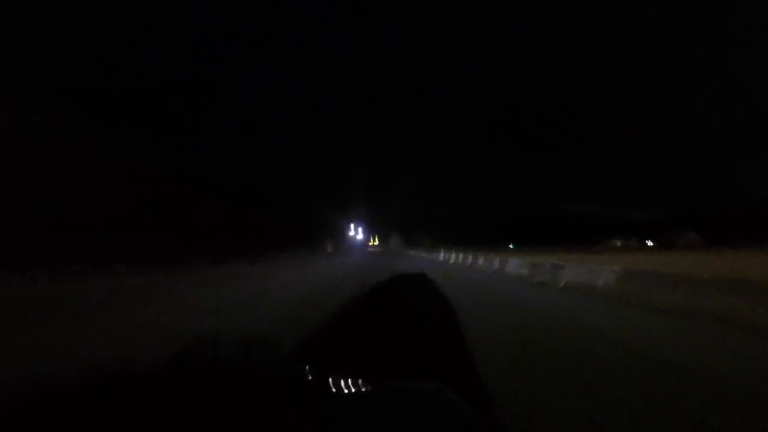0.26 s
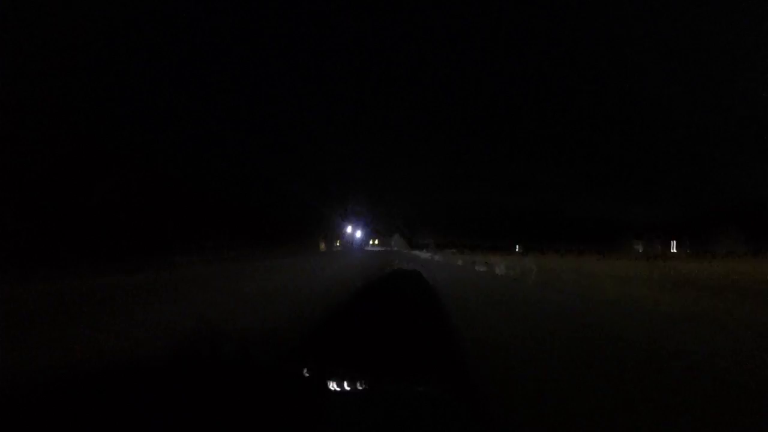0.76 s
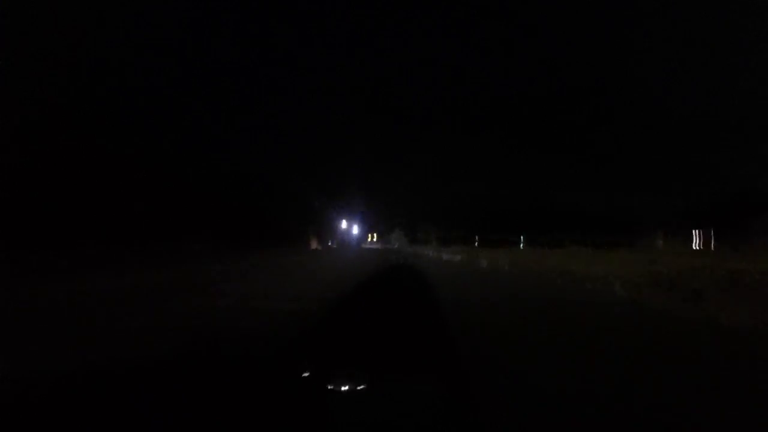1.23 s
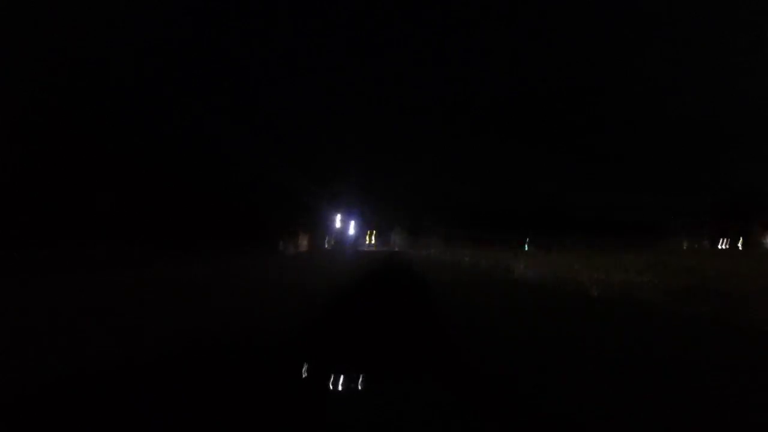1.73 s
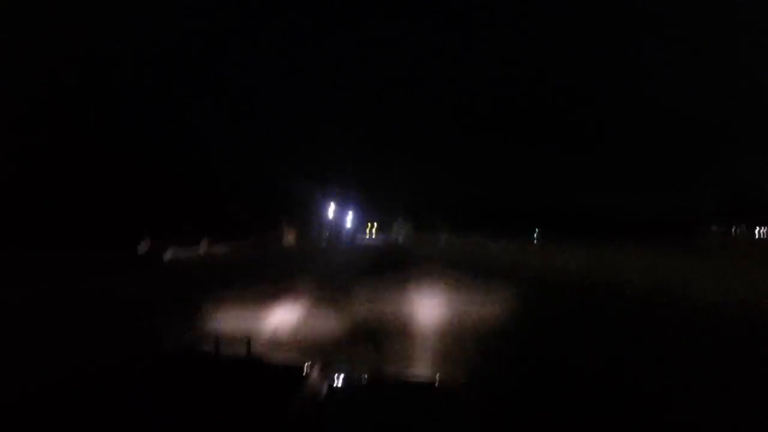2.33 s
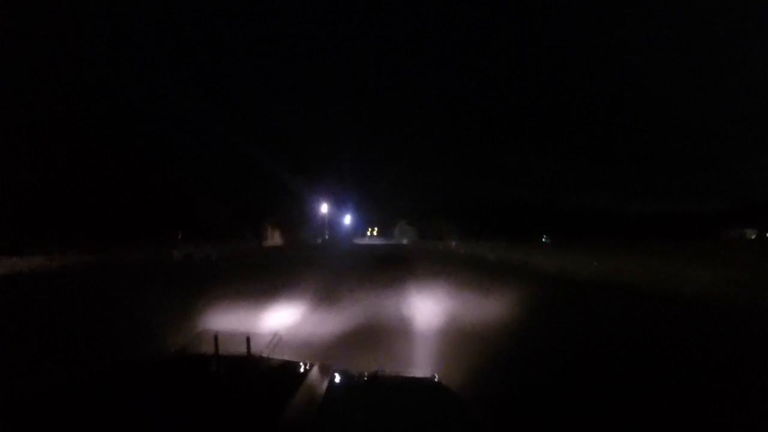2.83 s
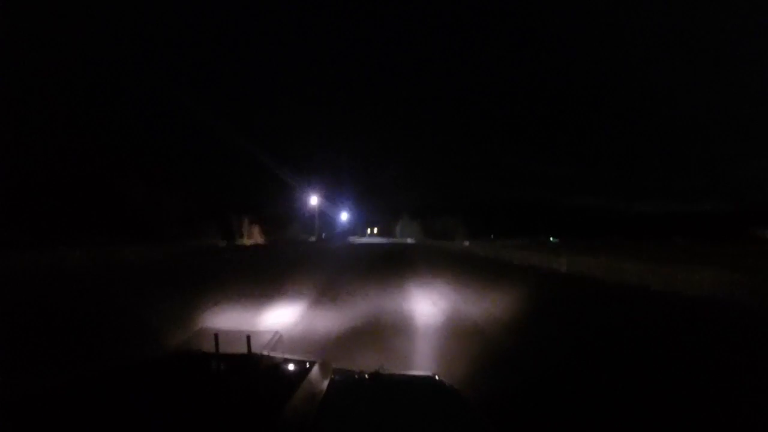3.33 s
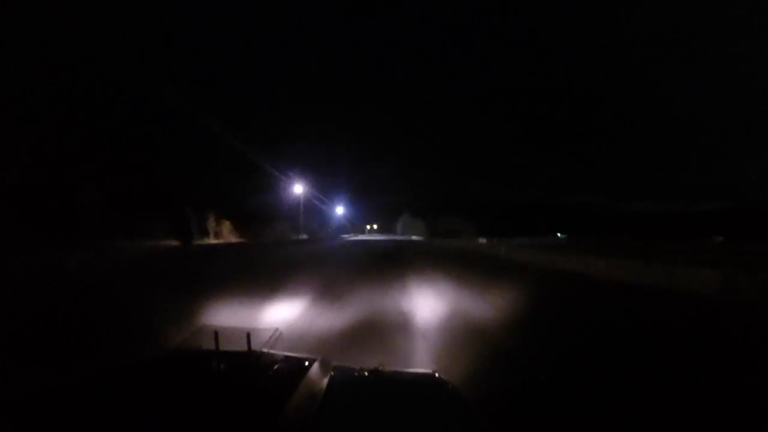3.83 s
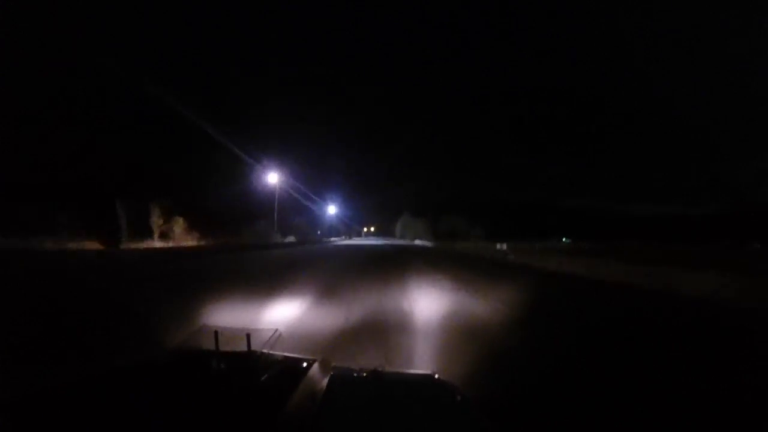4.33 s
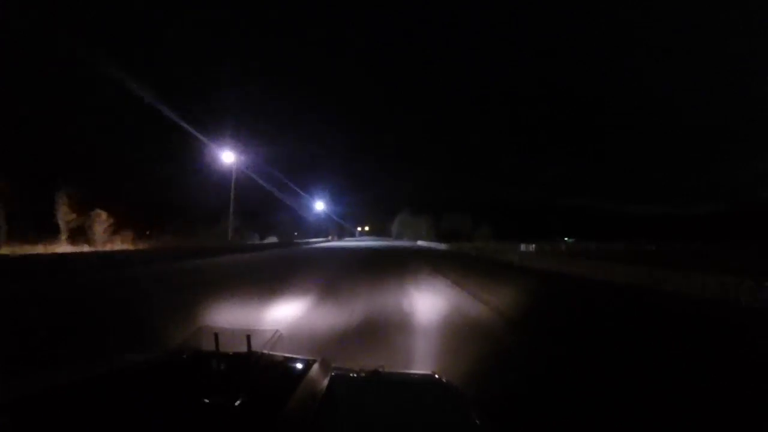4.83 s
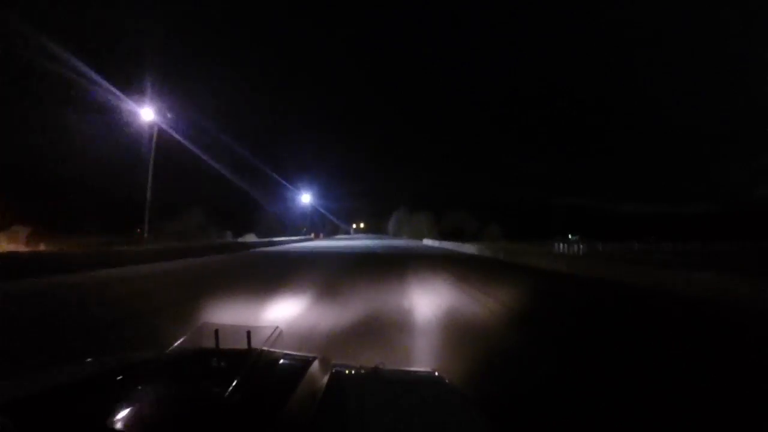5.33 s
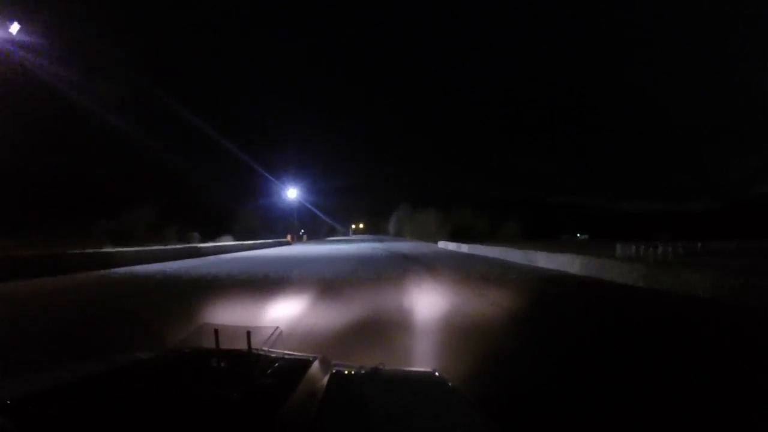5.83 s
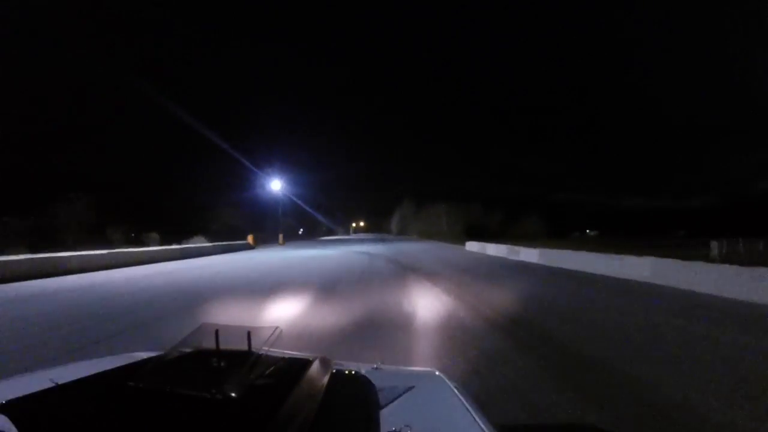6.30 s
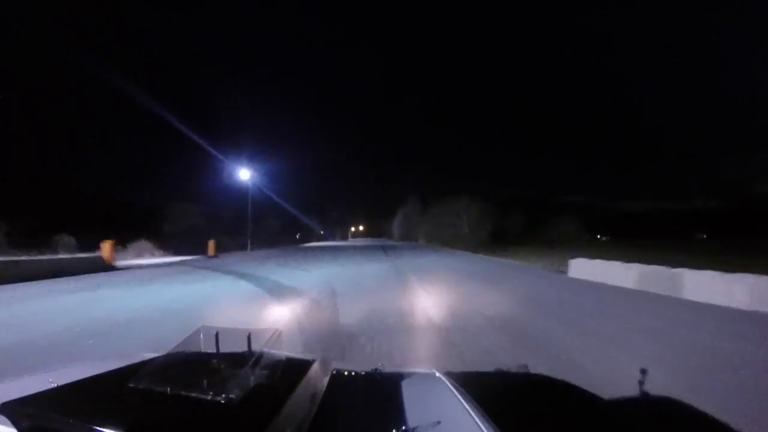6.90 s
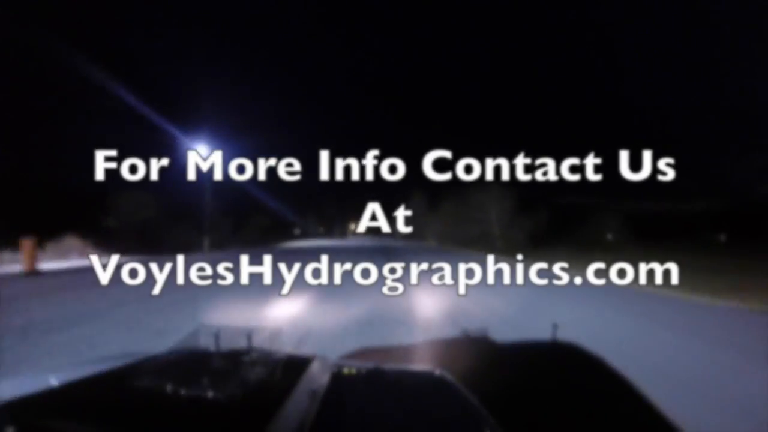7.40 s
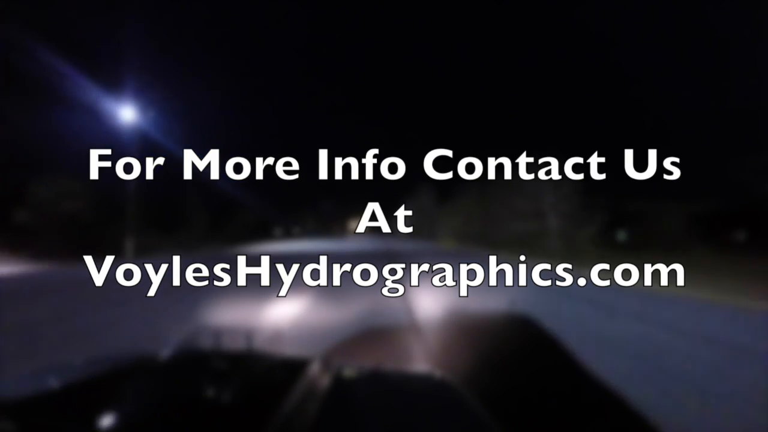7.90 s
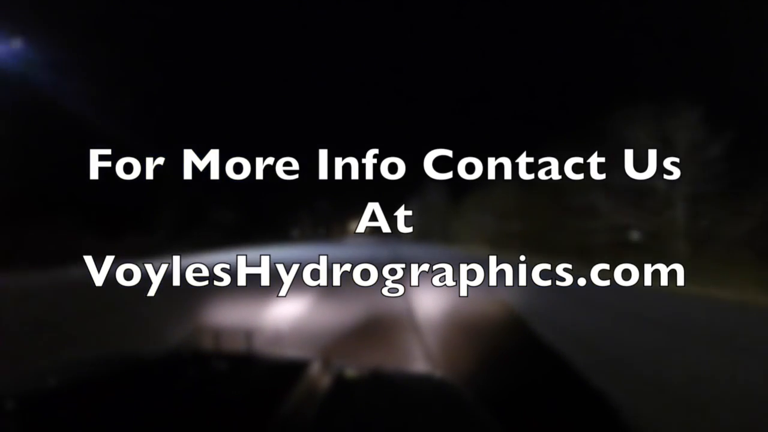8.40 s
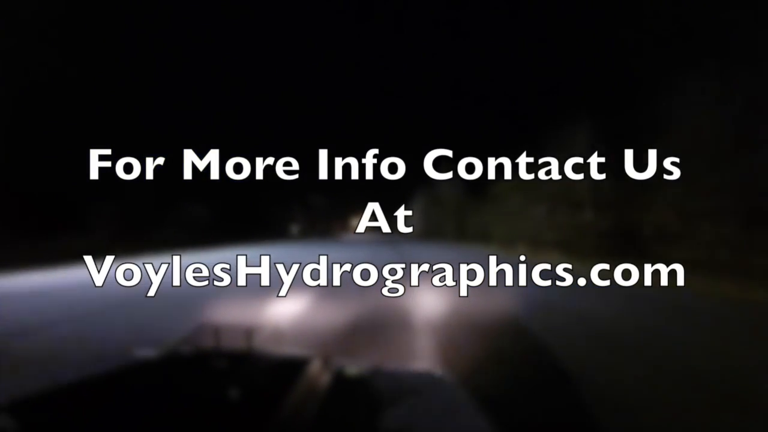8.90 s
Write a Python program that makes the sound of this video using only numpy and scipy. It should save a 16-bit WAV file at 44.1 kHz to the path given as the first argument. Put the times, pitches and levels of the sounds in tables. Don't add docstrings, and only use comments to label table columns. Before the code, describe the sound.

A microphone in a hard housing on a racing car takes a harsh, hissy wind rush while the car coasts down a night track. Low booms thump irregularly, ducking the level each time. Tyre hum and road rumble sink in pitch as the car slows. Three grit ticks come early and one faint one late; the wind gradually weakens while the buffets get heavier. No engine is heard.

```python
import sys
import numpy as np
from scipy import signal
from scipy.fft import rfft, irfft, next_fast_len
from scipy.io import wavfile
from scipy.ndimage import uniform_filter1d

SR = 44100
rng = np.random.default_rng(int(sys.argv[2]) if len(sys.argv) > 2 else 0)


def materialize(psi):
    bounded = np.clip(np.atleast_2d(psi).T, -1, 1)
    quanta = np.round(bounded * 32767).astype(np.int16)
    wavfile.write(sys.argv[1], SR, quanta)


def voltage_ratio(level):
    return 10 ** (np.asarray(level, float) / 20)


N = 403503
T = np.arange(N) / SR

# start_s [s], turns_hz [turns per s]
WHEEL_TURNS = [(0, 20.91), (.83, 19.43), (1.66, 18.05), (2.5, 16.84), (3.33, 15.67), (4.16, 14.54),
               (4.99, 13.64), (5.82, 12.76), (6.65, 12.26), (7.49, 11.68), (8.32, 11.08), (9.15, 10.42)]
# start_s [s], peak_db [dB]
GRIT_STRIKES = [
    (.3652, -9.5),
    (.7888, -6),
    (1.9975, -15),
    (7.3, -17),
]
# start_s [s], depth_db [dB]
JOLTS = [(0.01, 3.5), (0.1, 5.5), (0.713, 6), (1.078, 5), (1.182, 3), (1.447, 2), (1.561, 2), (1.871, 7.5),
         (2.05, 3), (2.13, 4.5), (2.31, 4.5), (2.405, 2.5), (2.624, 4), (2.739, 2), (3.123, 2.5),
         (3.302, 5), (3.687, 5.2), (3.861, 2), (4.195, 1.5), (4.42, 4.2), (4.854, 3), (6.28, 2.5),
         (7.603, 2.5), (7.796, 5), (8.092, 1.5), (8.232, 7), (8.326, 1.5), (8.576, 4.5)]


def evened(x):
    return x / np.sqrt(np.mean(x ** 2) + 1e-20)


def columns(rows):
    s, *rest = np.transpose(rows)
    return [np.interp(T, s, c) for c in rest]


def read(points, hz):
    f, value = np.transpose(points)
    return np.interp(np.log(hz + 1), np.log(f + 1), value, left=-90, right=-90)


def shaped(x, db_of):
    size = next_fast_len(N + 8192)
    gain = voltage_ratio(db_of(np.fft.rfftfreq(size, 1 / SR)))
    return irfft(rfft(x, size) * gain, size)[:N]


def drift(hz):
    count = N // 32 + 2
    f = np.fft.rfftfreq(count, 32 / SR)
    slow = irfft(rfft(rng.standard_normal(count)) * voltage_ratio(-12 * (f / hz) ** 2), count)
    return np.interp(T, np.arange(count) * 32 / SR, evened(slow))


def narrow(hz, width_hz, steady):
    z = drift(width_hz) + 1j * drift(width_hz)
    z = z / (abs(z) + 0.019) ** steady
    turning = np.exp(2j * np.pi * np.cumsum(hz * np.ones(N)) / SR)
    return evened((z * turning).real)


def swell(s, length_s):
    out = np.zeros(N)
    near = slice(max(round((s - length_s / 2) * SR), 0), round((s + length_s / 2) * SR))
    out[near] = np.cos(np.pi * (T[near] - s) / length_s) ** 2
    return out


def dips_db():
    fall_s, recover_s = 0.017, 0.12
    strikes = [(s + 0.0028, 9 * voltage_ratio(db) ** 2) for s, db in GRIT_STRIKES]
    total_db = np.zeros(N)
    for s, depth_db in [*JOLTS, *strikes]:
        fall = np.clip((T - s) / fall_s, 0, 1)
        total_db -= depth_db * fall * np.exp(-np.maximum(T - s, 0) / recover_s)
    return total_db


def turbulent_air():
    frames = N // 64 + 5
    a, b, patches = rng.standard_normal((frames, 129, 3)).T
    patches = evened(uniform_filter1d(uniform_filter1d(patches, 6, 0), 40, 1))
    air = signal.istft((a + 1j * b) * voltage_ratio(0.98 * patches), nperseg=256, noverlap=192)[1][:N]
    return air * voltage_ratio(0.39 * drift(42) + 0.86 * drift(190))


def rush():
    # start_s [s], level_db [dB]
    stream = [(0, -17.5), (.55, -17), (1.0, -15.5), (1.52, -17.5), (2.3, -17.5), (3.05, -18.5), (3.8, -19),
              (4.57, -19.3), (5.3, -21), (6.1, -22.5), (7.2, -22), (8.05, -23), (8.5, -23), (9.15, -22.5)]
    # start_s [s], pitch_hz [Hz], level_db [dB]
    whistle = [(0, 10400, -54), (1.2, 11200, -64), (1.7, 10300, -52), (2.1, 10400, -66), (5, 10450, -59),
               (5.5, 10600, -54), (6.1, 10420, -52), (6.6, 10360, -53), (7.1, 10340, -55),
               (7.6, 10290, -75)]
    # pitch_hz [Hz], level_db [dB per Hz]
    rush_colour = [(800, -29.5), (1270, -20), (1550, -10), (2050, -10), (2760, 1), (3700, -6),
                   (4800, -21.5), (5500, -21), (5800, -9.5), (6200, -11), (6750, -23.5), (7750, -31.5),
                   (10600, -31.5), (15300, -43.5)]
    # pitch_hz [Hz], change_db [dB]
    slowing = [(900, 4.5), (1600, 2.5), (2200, 1.5), (3200, -3.5), (6000, -1.5), (9000, 2.5), (16000, -0.5)]
    # pitch_hz [Hz], width_hz [Hz], height_db [dB]
    housing = [(1560, 110, 2), (2110, 340, -3), (2458, 124, 3), (2920, 110, -2), (3365, 160, -8),
               (3680, 440, -1.5), (4430, 170, 3), (5200, 180, 4), (6780, 150, -3.5), (7200, 710, 3.5),
               (8030, 410, 2), (10400, 870, 3), (13200, 750, 7), (12000, 650, 0)]

    def fast_db(f):
        bumps = sum(db * np.exp(-.5 * (2.53 * (f - hz) / w) ** 2) for hz, w, db in housing)
        return read(rush_colour, f) + bumps

    early = evened(shaped(turbulent_air(), fast_db))
    late = evened(shaped(early, lambda f: np.interp(f, *np.transpose(slowing))))
    air = early + (late - early) * T / T[-1]
    pitch_hz, whistle_db = columns(whistle)
    stream_db = columns(stream)[0] + dips_db()
    return voltage_ratio(stream_db) * air + voltage_ratio(whistle_db) * narrow(pitch_hz, 200, 0)


def buffeting():
    # start_s [s] (the middle), level_db [dB over the usual sway], length_s [s]
    booms = [(0.08, 11, 0.24), (0.229, 11, 0.081), (0.319, 12, 0.18), (0.695, 10.5, 0.083),
             (1.455, 11.5, 0.058), (1.886, 5, 0.07), (2.415, 10.5, 0.14), (2.933, 7.8, 0.19),
             (3.137, 9, 0.085), (3.862, 5, 0.07), (4.21, 8.6, 0.085), (4.427, 7.5, 0.13),
             (4.859, 9.1, 0.07), (5.308, 4, 0.062), (5.43, 9, 0.18), (5.946, 10, 0.07), (6.306, 13, 0.11),
             (6.695, 12, 0.11), (6.785, 8.2, 0.12), (7, 14, 0.055), (7.428, 10, 0.14), (7.55, 7.9, 0.1),
             (7.633, 10, 0.075), (7.823, 9, 0.1), (8.011, 11, 0.088), (8.132, 12.5, 0.17), (8.24, 8, 0.063),
             (8.364, 9, 0.18), (8.571, 11.9, 0.12), (9.069, 8.1, 0.23)]
    # start_s [s] (the middle), level_db [dB over the usual sway]
    more_booms = [(0.466, 11), (0.806, 7.1), (1.075, 9), (1.18, 10), (1.342, 8), (1.569, 3), (1.681, 14),
                  (2.103, 11), (2.17, 10), (2.31, 4), (2.549, 8), (2.634, 7.5), (2.739, 7.5), (2.859, 4),
                  (3.023, 5.5), (3.307, 6.7), (3.38, 10.5), (3.594, 6.8), (3.702, 5), (4.066, 3), (4.33, 6),
                  (4.517, 3), (4.652, 8), (4.974, 12), (5.762, 4), (5.874, 7.5), (6.034, 14.5), (6.602, 7),
                  (7.321, 2), (8.733, 5)]
    rows = [*booms, *((s, db, 0.079) for s, db in more_booms)]
    bumps = [swell(s, length_s) for s, _, length_s in rows]
    chance = np.maximum(1 + 0.61 * drift(8), .08)
    usual = 1 + (chance - 1) * (1 - np.minimum(2 * sum(bumps), 1))
    strong = sum((voltage_ratio(db) - 1) * bump for (_, db, _), bump in zip(rows, bumps))
    kicks = np.zeros(N)
    for s, depth_db in JOLTS:
        rise = np.clip((T - s) / .006 + 1, 0, 1)
        kicks += 0.46 * depth_db * rise * np.exp(-np.maximum(T - s, 0) / 0.023)
    calm = 1 - .8 * swell(.955, .2)
    start_db, end_db = -26, -20.5
    sway_db = start_db + (end_db - start_db) * T / T[-1]
    return voltage_ratio(sway_db) * (usual + strong + kicks) * calm


def mount():
    # start_s [s], sway_hz [Hz], bracket_db [dB], effort_db [dB]
    mount_path = [(0.0, 61.07, -29, -1), (1.5, 68.8, -35, -1.5), (1.63, 61.14, -33, -3),
                  (2.29, 72.07, -29, -4.5), (2.57, 65, -31, 0.0), (3.08, 74.8, -43, 2.5),
                  (3.26, 61.9, -26, -6.5), (3.59, 72.9, -31.5, 0.5), (5.12, 75.6, -19.5, -1.5),
                  (5.25, 68.6, -21.5, 0.5), (5.99, 67.47, -17, 0.5), (6.12, 80.9, -20, -0.5),
                  (6.6, 74.87, -18.5, -1.5), (7.21, 82.8, -17.5, 0.5), (7.92, 72.1, -20, -0.5),
                  (8.05, 78.0, -16, -4.5), (8.46, 65.82, -27, 1), (9.15, 79.5, -24, -2.5)]
    # pitch_hz [Hz], level_db [dB per Hz]
    thud = [(8, -22), (14, -21), (20, -8), (29, -16), (38, -0.5), (50, 2), (70, 6.5), (100, -6),
            (130, -9.5), (200, -62)]
    sway_hz, bracket_db, effort_db = columns(mount_path)
    sway_hz = uniform_filter1d(sway_hz, size=2000) + 1
    sway = voltage_ratio(effort_db) * buffeting() * narrow(sway_hz, 3.5, .9)
    bracket = voltage_ratio(bracket_db + .5 * dips_db()) * narrow(89.25, 3, .5)
    pressure = evened(shaped(rng.standard_normal(N), lambda f: read(thud, f)))
    return sway + voltage_ratio(-.5) * bracket + voltage_ratio(-23.5) * pressure


def wheel_angle():
    turns_hz = columns(WHEEL_TURNS)[0]
    return turns_hz, 2 * np.pi * np.cumsum(turns_hz) / SR


def braking():
    return np.clip((T - 1.7) / 0.4, 0, 1)


def tyre_hum():
    # multiple [of the turning rate], level_db [dB]
    multiples = [(10, 5), (13, -1), (14, -4), (15, -2), (16, 0), (17, -4), (20, 1), (21, -4), (22, 3),
                 (23, -4), (24, 1), (26, 1), (28, 2), (30, 5), (32, -5), (33, -3), (34, -5), (35, 0)]
    # pitch_hz [Hz], width_hz [Hz], fast_db [dB at top speed],
    # braked_db [dB on the brakes], loss_db [dB lost per s]
    panels = [(165, 44, -52, -38, 4), (205, 30, -46, -41, 0), (272, 30, -37, -40, 1),
              (352, 32, -46, -35, 0), (386, 38, -50, -38, 0), (420, 34, -50, -40, .6)]
    # start_s [s], level_db [dB]
    tread_load = [
        (0, 0),
        (4.6, 0),
        (5.2, -3),
        (5.5, 3),
        (6.35, 3),
        (6.55, -9),
        (6.85, -9),
        (7.05, 1),
        (9.15, 0),
    ]
    turns_hz, angle = wheel_angle()
    slow_hz, braked, late_s = turns_hz[::64], braking()[::64], np.maximum(T[::64] - 3, 0)
    hum = np.zeros(N)
    for k, db in multiples:
        near = 0
        for hz, width_hz, fast_db, braked_db, loss_db in panels:
            panel_db = fast_db + (braked_db - fast_db) * braked - loss_db * late_s
            near = near + voltage_ratio(panel_db) * np.exp(-(2 * (k * slow_hz - hz) / width_hz) ** 4)
        ring = np.sqrt(2) * voltage_ratio(db) * np.repeat(near, 64)[:N]
        hum += ring * voltage_ratio(1.5 * drift(2)) * np.cos(k * angle + k)
    return voltage_ratio(-2.5 + columns(tread_load)[0]) * hum


def tyres():
    # start_s [s], rumble_db [dB], shake_db [dB], hop_db [dB]
    road_levels = [(0, -29, -25, -34), (1, -30, -24.5, -50), (1.8, -29.5, -19, -50), (2.4, -26, -24, -50),
                   (3.2, -28.5, -24, -45), (4.2, -27, -34, -44), (5, -28.5, -38, -32), (6, -29, -46, -32),
                   (7, -30, -48.5, -25), (8, -28.5, -50, -17), (9.15, -31, -52, -40)]
    # pitch_hz [Hz], level_db [dB per Hz]
    body_fast = [(59, -36), (100, -21), (134, -1), (161, -12), (193, -6.5), (263, -3), (331, -3.5),
                 (424, -15.5), (617, -17.5), (1040, -20), (1200, -31), (1560, -40), (2640, -120)]
    # pitch_hz [Hz], level_db [dB per Hz]
    body_settled = [(59, -54), (100, -7.5), (118, -6.5), (183, -17.5), (223, -14), (247, -14.5),
                    (280, -4.5), (320, -13), (356, -7.5), (429, -22), (471, -26.5), (630, -29.5),
                    (714, -22.5), (955, -28), (1200, -36.5), (1560, -44), (2640, -120)]
    angle, braked = wheel_angle()[1], braking()
    comb = sum(voltage_ratio(3 * drift(1.5)) * np.cos(k * angle + k * k) for k in range(12, 40))
    comb = shaped(evened(comb) * np.clip(T - 1, 0, 1), lambda f: -60. * (f > 440))
    noise = rng.standard_normal(N) + voltage_ratio(-19.5) * comb
    fast = evened(shaped(noise, lambda f: read(body_fast, f)))
    settled = evened(shaped(noise, lambda f: read(body_settled, f)))
    road_db, shake_db, hop_db = columns(road_levels)
    road = voltage_ratio(road_db + 2.5 + 1.27 * dips_db()) * ((1 - braked) * fast + braked * settled)
    shake = voltage_ratio(shake_db) * (np.cos(angle) + .3 * np.cos(2 * angle))
    hop = voltage_ratio(hop_db) * narrow(19, 1.7, 0.23)
    return road + tyre_hum() + shake + hop


def grit():
    out, t = np.zeros(N + 400), np.arange(400) / SR
    ring = np.sin(2 * np.pi * (1400 * t + 2.6e5 * t ** 2))
    ring = ring * np.exp(-((t - .0014) / .0011) ** 2)
    for s, peak_db in GRIT_STRIKES:
        start = round(s * SR) - 8
        out[start:start + 400] -= voltage_ratio(peak_db) * ring / abs(ring).max()
    return out[:N]


def scene():
    return (rush() + mount() + tyres() + grit())[None]


def band_limit(x):
    return signal.sosfilt(signal.butter(12, 15230, fs=SR, output="sos"), x)


def record(dry):
    peak_db = 20 * np.log10(uniform_filter1d(abs(dry[0]), 90) + 1e-6)
    fall_db = T * 60
    held_db = np.maximum.accumulate(peak_db + fall_db) - fall_db
    over_db = np.maximum(held_db + 8.5, 0)
    ducked = dry * voltage_ratio(0.5 - .5 * uniform_filter1d(over_db, size=130, origin=64))
    return band_limit(np.clip(ducked, -.97, .97))


dry = scene()
out = record(dry)
materialize(out)
```